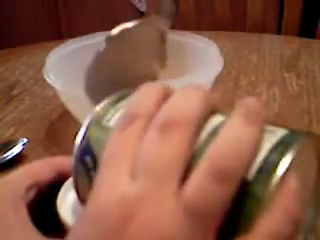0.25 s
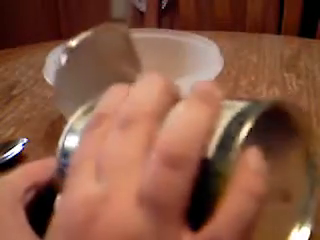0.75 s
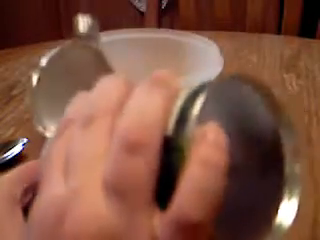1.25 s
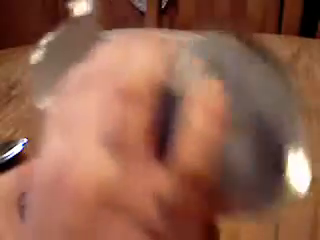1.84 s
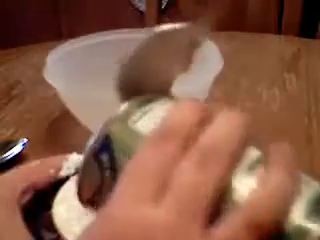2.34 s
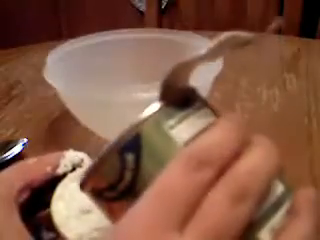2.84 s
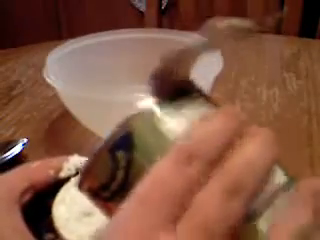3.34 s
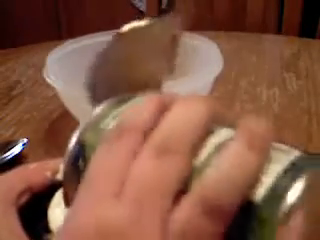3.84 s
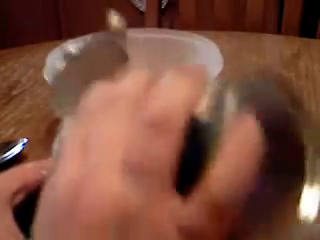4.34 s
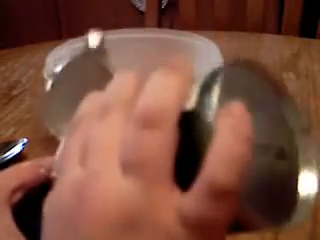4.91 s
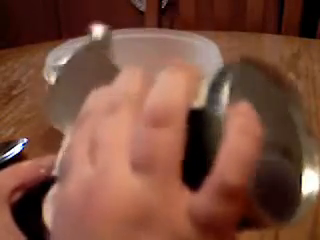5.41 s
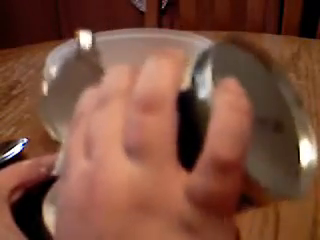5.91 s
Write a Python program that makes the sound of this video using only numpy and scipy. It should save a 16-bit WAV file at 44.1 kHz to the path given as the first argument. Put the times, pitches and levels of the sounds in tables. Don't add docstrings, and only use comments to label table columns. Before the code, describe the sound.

A refrigerator's low motor hum and soft fan whir run throughout, beneath steady camera hiss and very thin high electronic whines. Around 0.5 seconds, two faint finger touches fall almost together on a metal can. At 1.6 a hard, hollow knock sounds on the lifted can, followed by a small touch at 1.8 and a full, dull thump on the wooden table near 2.2. At 3.1 a lighter knock rings the can's base and lid more brightly. Faint finger shifts come at 3.5 and 3.95, then another heavy thump at 4.3. From 5.1 a run of five thumps follows, roughly every quarter second, growing firmer until 5.8, with a softer last one at 6.06. Each hit has low table resonance, a short tin ring, a slight rattle of powder and a brief kitchen echo, heard close by a small tabletop microphone.

```python
import sys
import numpy as np
from scipy import signal
from scipy.fft import rfft, irfft, next_fast_len
from scipy.io import wavfile
from scipy.ndimage import uniform_filter1d

SR = 44100
rng = np.random.default_rng(int(sys.argv[2]) if len(sys.argv) > 2 else 0)


def store_pcm(level_fs):
    pcm = np.round(np.clip(level_fs, -1, 1) * 32767).astype(np.int16)
    wavfile.write(sys.argv[1], SR, np.atleast_2d(pcm).T)


def to_linear_factor(level_db):
    exponent = np.asarray(level_db, float) / 20
    return 10 ** exponent


N = 272097

# [f/Hz, density/dB per Hz]
HISS_SPECTRUM = [(1000, 3.5), (3000, 1.5), (5000, -1.5), (8000, -3.5), (8600, -2.5), (9500, -5.5),
                 (13000, -7.5)]
# [f/Hz, rms level/dB]
WHINES = [(3321, -67), (3900, -65), (3919.6, -69), (4190, -72), (5243, -69), (5512, -68), (5859, -68),
          (6431.3, -56), (6823.2, -61), (7350, -71), (8059, -74), (8403, -71), (9760, -74), (9986, -73),
          (10331, -77), (10514, -77), (11539, -78), (12066, -73), (12290, -75)]
BAND_TOP_HZ = (12700, 12530)
# [f/Hz, rms level/dB, flutter width/Hz, steady
TONAL_LINES = [(60, -45.5, 6.4, 0.89), (67, -50.5, 29, 0), (119.7, -36, 3.1, 0.99),
               (208.5, -37.5, 24, 0.87), (241.5, -40, 18, 0.43), (359.6, -53.5, 5, 0.07),
               (413.4, -50.5, 7.6, 0.28), (750, -55, 27, 0.1), (1073, -54.5, 20, 0.3),
               (1180, -58, 25, 0.86), (1213, -52.5, 16.5, 0.23), (2960, -59, 71, 0.01)]
# [f/Hz, density/dB per Hz]
FAN_SPECTRUM = [(20, -14), (45, -5.5), (100, -6), (135, 2.5), (300, 2), (500, -2.5), (1250, -5),
                (1550, -11), (2200, -12.5), (3300, -20), (4500, -27)]
# [f/Hz, t60/s]
KITCHEN_T60 = [(150, 0.48), (600, 0.22), (1500, 0.18), (4000, 0.24)]
# [f/Hz, level/dB]
ECHO_COLOUR = [(60, -30), (200, -13), (500, -3), (900, -2), (1300, -2), (2500, -8)]
# [delay/s, level/dB]
EARLY_RETURNS = [(.00455, -6.8), (.02073, -15)]
# [f/Hz, density/dB per Hz]
POWDER_SPECTRUM = [(300, -9), (480, -9), (800, -4), (1250, -8), (1500, -14), (2200, -29), (3500, -45)]
# [f/Hz, level/dB, t60/s, first swing/+-1]
TABLE_TOP = [(89.5, -24.4, 0.205, 1), (125.7, -6.3, 0.6, -1), (126.4, -1.1, 0.288, 1),
             (166.3, -7.0, 0.241, 1), (170.4, 2.3, 0.056, -1), (194.7, -33.9, 0.6, 1)]
# [f/Hz, level/dB, t60/s, first swing/+-1]
TABLE_EDGE = [(284.9, -8.6, 0.059, -1), (311.8, -12.0, 0.29, -1), (324.0, -7.2, 0.095, -1),
              (336.6, 3.1, 0.015, 1), (372.6, -41.7, 0.6, 1), (406.0, -7.4, 0.029, -1),
              (435.6, -20.7, 0.082, -1), (480.0, -31.7, 0.246, -1), (517.5, -29.2, 0.336, -1),
              (540.1, -23.8, 0.31, 1)]
# [f/Hz, level/dB, t60/s, first swing/+-1]
CAN_WALL = [(239.5, -14.7, .3, -1), (307.5, -10.1, .27, 1)]
# [f/Hz, level/dB, t60/s, first swing/+-1]
CAN_BASE = [(643.5, -25, .12, -1), (698.7, -27, .12, -1), (737.3, -9.1, .027, 1), (805, -32, .2, 1),
            (846.9, -17.6, .087, -1), (880.9, -16.5, .06, 1), (959.2, -28, .2, 1), (1166, -15.8, .015, -1),
            (1200, -30, .12, 1), (1305, -26, .08, 1), (1415, -29, .15, -1), (535, -30, .2, 1)]
# [f/Hz, level/dB, t60/s, first swing/+-1]
LID = [(1054, -21.1, 0.1, -1), (1063, -17, .056, 1), (1180, -16.5, 0.035, -1), (1737, -19, 0.022, 1),
       (2020, -24, 0.027, -1), (2200, -28.5, 0.025, 1)]
# [f/Hz, level/dB, t60/s, first swing/+-1]
LID_RIM = [(1022, -29, .9, 1), (1204, -30, .9, 1), (1238, -27, .9, -1), (1366, -34, .5, -1)]
# [t/s, blow level/dB, table top level/dB, can base level/dB]
TOUCHES = [
    (.532, -19.5, -3, -1),
    (.56, -21, -2, -4),
    (1.827, -19.5, -15, 4),
    (3.50, -29, -14, 8),
    (3.951, -23, 0, 5.5),
]
# [t/s, blow level/dB, table top level/dB, can level/dB]
THUMPS = [
    (2.1634, -0.4, 0.5, -5),
    (4.3296, -0.6, 1, -3.5),
    (5.1461, -3.5, 1.5, -6),
    (5.383, -3, 3.5, -4.5),
    (5.5849, -2, 3, -3),
    (5.804, -0.5, 3.5, -4.5),
    (6.062, -4.5, 3.5, -7.5),
]
# [t/s, blow level/dB, can wall level/dB, can base level/dB, lid level/dB]
KNOCKS = [
    (1.616, 2.5, -2, -5, -5),
    (3.0576, -6, -7, 7.5, 1.5),
]

OFFSET = -.0064
FAN_DB, FAN_SWELL_DB, FAN_SWELL_S, FAN_SWELL_WIDTH_S = -36, 0.75, 2.5, 1.1
WALL_UNDER_BASE_DB, HELD_LID_DB = 1, -27
TOUCH_WALL_DB, TOUCH_LID_DB = -4, -10
STILL_TABLE_DB = -16.5
RIM_DB = 6.5
POWDER_DB, POWDER_FOLLOWS = -30.5, 0.66
POWDER_LID_DB = -31.5


def unit(x):
    return x / np.sqrt(np.mean(x ** 2) + 1e-20)


def along(points, hz):
    f, v = np.transpose(points)
    return np.interp(np.log(hz + 1), np.log(f + 1), v)


def filtered(x, response):
    m = next_fast_len(len(x) + 8192)
    return irfft(rfft(x, m) * response(np.fft.rfftfreq(m, 1 / SR)), m)[:len(x)]


def rush(spectrum, patchy_db):
    z = signal.stft(rng.standard_normal(N + 512), nperseg=512)[2]
    field = rng.standard_normal(z.shape)
    field = uniform_filter1d(uniform_filter1d(field, 5, 0), 10, 1)
    x = signal.istft(z * to_linear_factor(patchy_db * unit(field)), nperseg=512)[1][:N]
    points = [(5, -48)] + spectrum + [(16000, -63)]
    return unit(filtered(x, lambda hz: to_linear_factor(along(points, hz))))


def camera():
    t = np.arange(N) / SR
    flicker = rng.standard_normal(N)
    flicker = unit(uniform_filter1d(uniform_filter1d(flicker, size=170), size=170))
    out = to_linear_factor(-45 + 0.86 * flicker) * rush(HISS_SPECTRUM, patchy_db=.5)
    for hz, db in WHINES:
        wander_rad = .004 * np.cumsum(rng.standard_normal(N))
        out += to_linear_factor(db) * np.sqrt(2) * np.sin(2 * np.pi * hz * t + wander_rad)
    return out


def refrigerator():
    t = np.arange(N) / SR
    swell_db = FAN_SWELL_DB * np.exp(-((t - FAN_SWELL_S) / FAN_SWELL_WIDTH_S) ** 2)
    out = to_linear_factor(FAN_DB + swell_db) * rush(FAN_SPECTRUM, patchy_db=0.84)
    for hz, db, width_hz, steady in TONAL_LINES:
        noise = rng.standard_normal(N)
        flutter = unit(filtered(noise, lambda f: 1 / (1 + (2 * (f - hz) / width_hz) ** 4)))
        tone = np.sqrt(2) * np.sin(2 * np.pi * (hz * t + rng.random()))
        out += to_linear_factor(db) * (np.sqrt(steady) * tone + np.sqrt(1 - steady) * flutter)
    return out


def echo(x):
    hz, t, z = signal.stft(rng.standard_normal(len(x)), SR, nperseg=512)
    t60_s = np.maximum(along(KITCHEN_T60, hz), .05)[:, None]
    tail = signal.istft(z * to_linear_factor(-60 * t / t60_s), SR, nperseg=512)[1]
    tail = np.pad(tail / np.linalg.norm(tail), (round(.012 * SR), 0))
    out = signal.fftconvolve(x, tail)[:len(x)]
    out = filtered(out, lambda f: to_linear_factor(along(ECHO_COLOUR, f) - 7.5))
    for delay_s, db in EARLY_RETURNS:
        out += to_linear_factor(db) * np.pad(x, (round(delay_s * SR), 0))[:len(x)]
    return out


def powder(t, t60_s):
    rattle = unit(filtered(rng.standard_normal(len(t)), lambda f: to_linear_factor(along(POWDER_SPECTRUM, f))))
    return rattle * to_linear_factor(-60 * t / t60_s) * (1 - np.exp(-t / 0.0067))


def ring(modes, t, scatter_db):
    out = np.zeros(len(t))
    for hz, db, t60_s, swing in modes:
        new_db = db + scatter_db * rng.standard_normal()
        out += np.sign(swing) * to_linear_factor(new_db - 60 * t / t60_s) * np.sin(2 * np.pi * hz * t)
    return out


def contacts():
    thumps = [(s, blow, top, can - WALL_UNDER_BASE_DB, can, HELD_LID_DB) for s, blow, top, can in THUMPS]
    knocks = [(s, blow, STILL_TABLE_DB, wall, base, lid) for s, blow, wall, base, lid in KNOCKS]
    touches = [(s, blow, top, TOUCH_WALL_DB, base, TOUCH_LID_DB) for s, blow, top, base in TOUCHES]
    return sorted(thumps + knocks) + touches


def taps():
    out, t = np.zeros(N + SR), np.arange(SR // 3) / SR
    half = 60
    contact = np.exp(-((np.arange(-half, half + 1) / SR) / .00008) ** 2 / 2)
    contact /= contact.sum()
    grip = np.exp(-(t / 0.14) ** 4)
    for s, blow_db, top_db, wall_db, base_db, lid_db in contacts():
        table = to_linear_factor(top_db) * ring(TABLE_TOP, t, scatter_db=.2)
        table += ring(TABLE_EDGE, t, scatter_db=.4)
        can = grip * to_linear_factor(wall_db) * ring(CAN_WALL, t, scatter_db=.3)
        can += to_linear_factor(base_db) * ring(CAN_BASE, t, scatter_db=.8)
        rim = grip * to_linear_factor(wall_db + RIM_DB) * ring(LID_RIM, t, scatter_db=.8)
        lid = to_linear_factor(lid_db) * (ring(LID, t, scatter_db=.8) + rim)
        grains_gain = to_linear_factor(POWDER_FOLLOWS * base_db + POWDER_DB) + to_linear_factor(lid_db + POWDER_LID_DB)
        grains = grains_gain * powder(t, t60_s=0.72)
        tap = to_linear_factor(blow_db) * (grip * (table + grains) + can + lid)
        tap = np.convolve(np.pad(tap, (half, 0)), contact, "same")
        start = round(s * SR) - half
        out[start:start + len(tap)] += tap + echo(tap)
    return filtered(out[:N], lambda f: (1j * f / (40 + 1j * f)) ** 2)


def scene():
    return (refrigerator() + taps())[None]


def roll_off(x):
    return signal.sosfilt(signal.butter(12, 13360, fs=SR, output="sos"), x)


def record(dry):
    noisy = dry[0] + camera()
    wide, narrow = [filtered(noisy, lambda f: f < top_hz) for top_hz in BAND_TOP_HZ]
    late = np.interp(np.arange(N) / SR, (2.6, 3), (0, 1))
    mix = (1 - late) * wide + late * narrow + OFFSET
    return roll_off(mix[None])


dry = scene()
out = record(dry)
store_pcm(out)
```